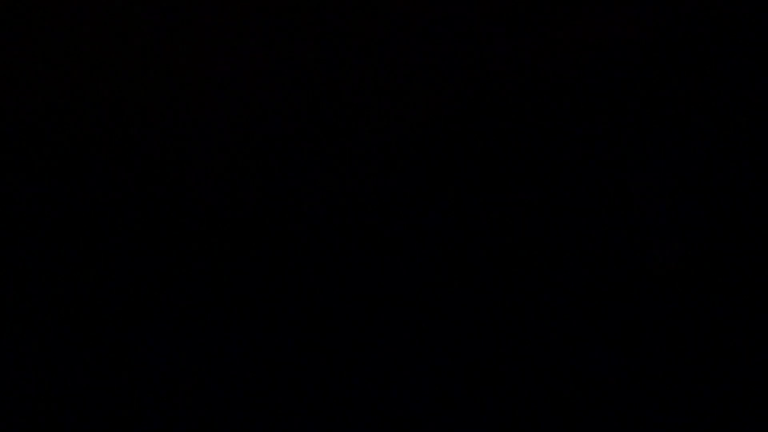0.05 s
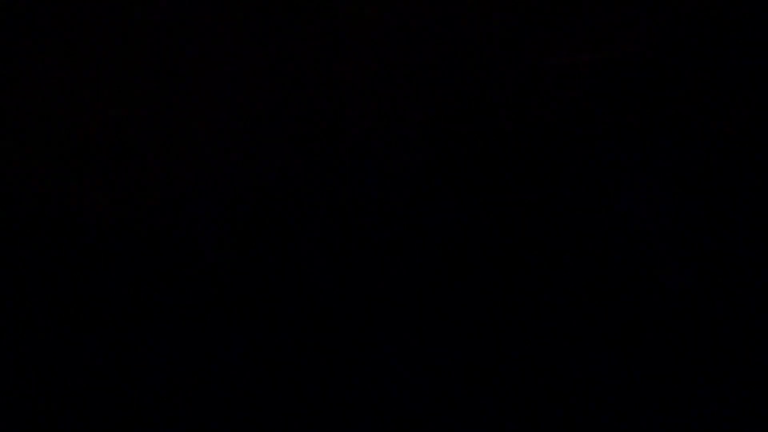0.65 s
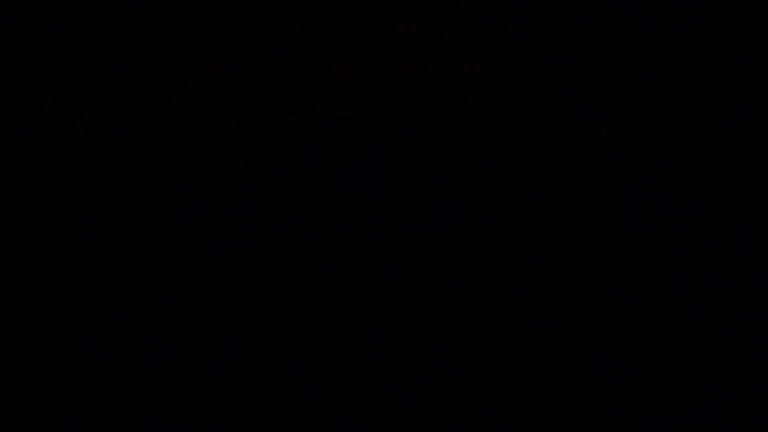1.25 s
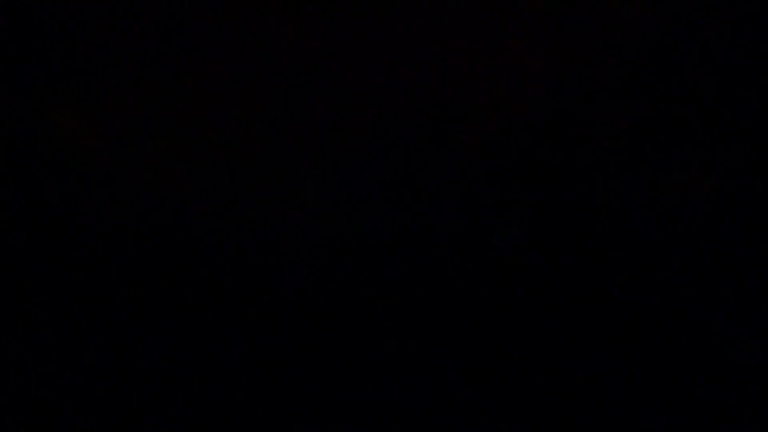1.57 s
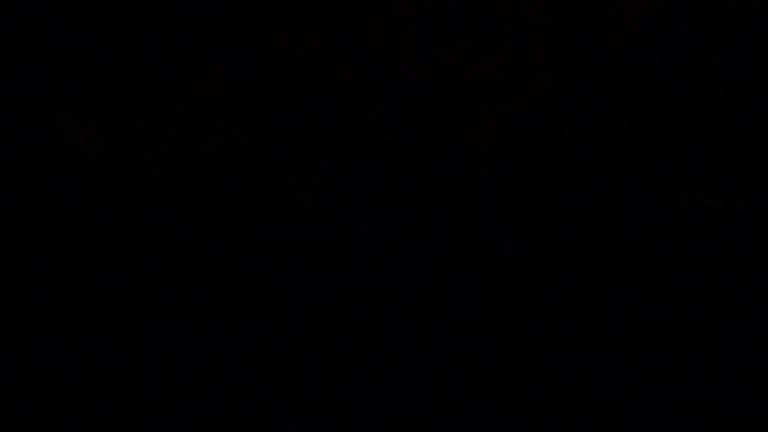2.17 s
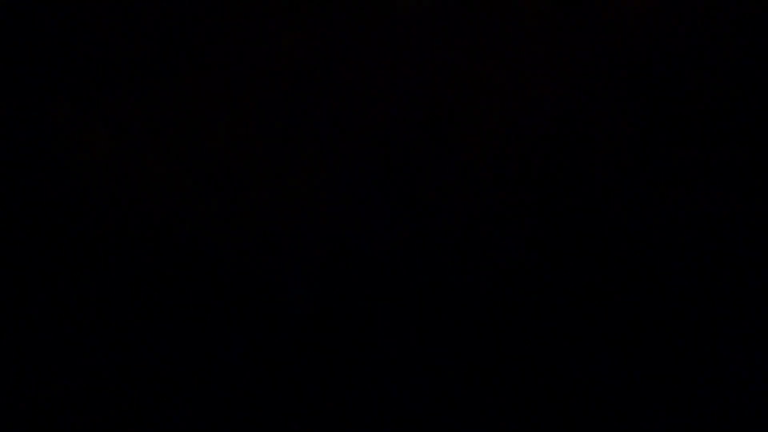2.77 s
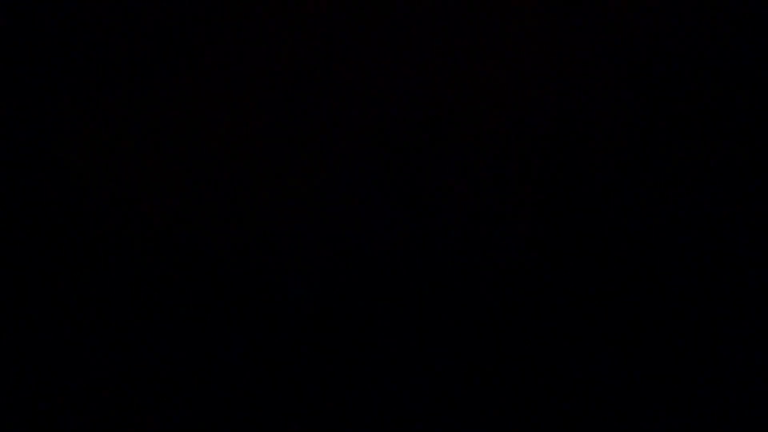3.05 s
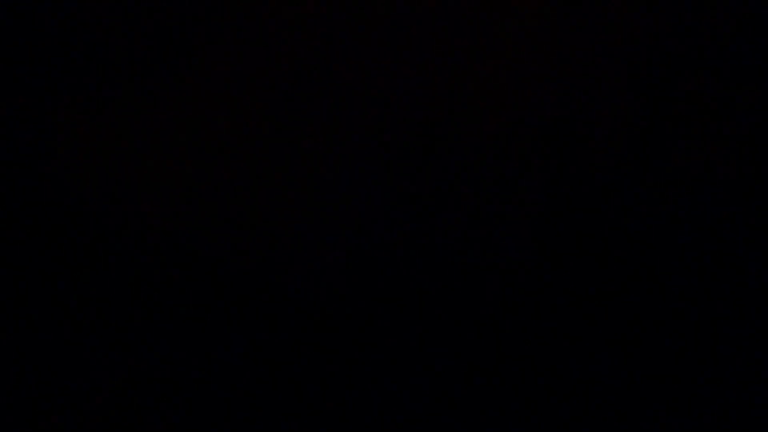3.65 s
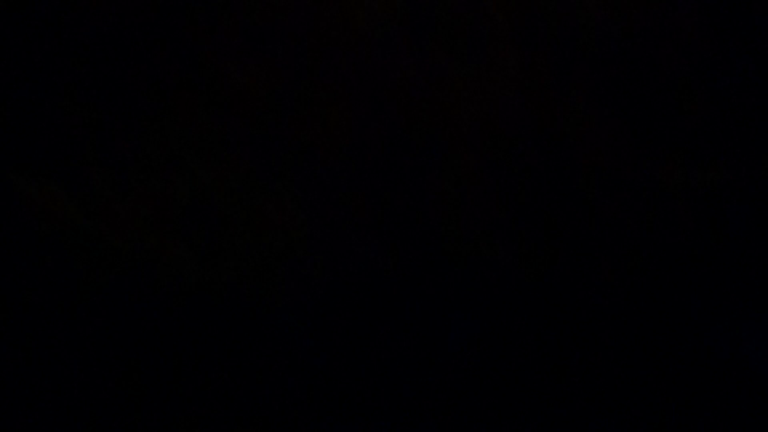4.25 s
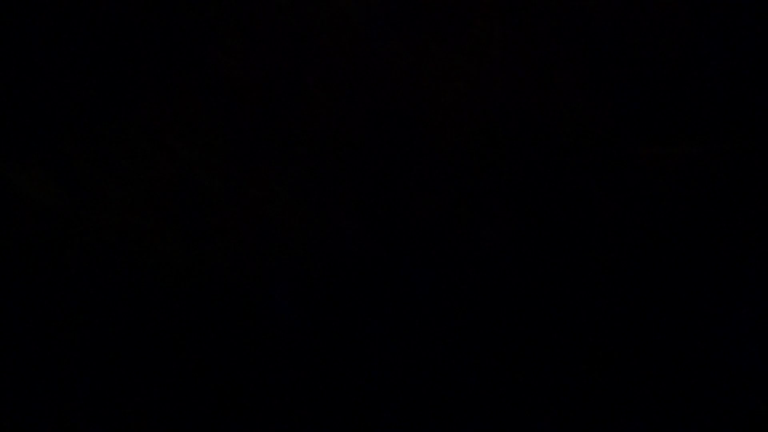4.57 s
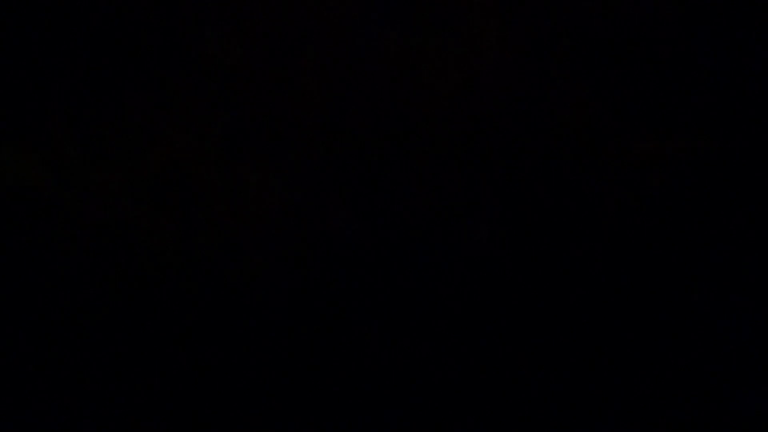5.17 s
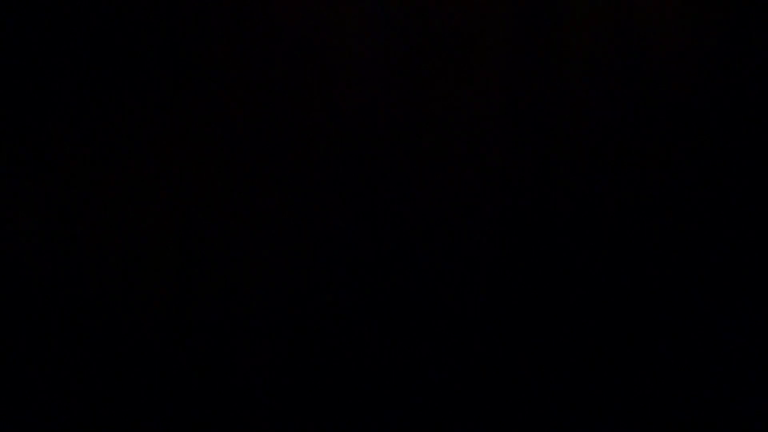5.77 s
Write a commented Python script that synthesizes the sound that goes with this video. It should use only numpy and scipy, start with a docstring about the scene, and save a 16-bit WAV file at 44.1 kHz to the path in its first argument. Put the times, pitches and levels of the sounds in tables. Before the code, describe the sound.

Fingers click and rub on a camera right by the microphone, against the soft hush and faint hiss of night woodland. A young owl gives two high, wheezy whistles that each turn into a rasping screech, with a short echo from the trees. A flurry of sharp handling clicks and dull bumps follows, then the owl begs once more and a few last clicks come as the echo fades.

```python
"""A quiet wood at night: a low hush and a faint hiss go on throughout, and from the start fingers
rub, click and bump on a camera's case close by. At about 1.4 s a young owl begs twice in a row:
each call is a thin, wheezy whistle that breaks into a harsh screech, and the trees throw it back.
The fingers are busiest between 2 and 3 s. At about 4.3 s the owl begs a third time,
and a few last clicks and a rub follow as its echo dies away."""
import sys
import numpy as np
from scipy import signal
from scipy.fft import rfft, irfft
from scipy.io import wavfile

SR = 44100
rng = np.random.default_rng(int(sys.argv[2]) if len(sys.argv) > 2 else 0)


def master(y):
    """Save y as 16-bit WAV."""
    cut = np.clip(np.atleast_2d(y).T, -1, 1)
    pcm = np.round(cut * 32767)  # scale
    wavfile.write(sys.argv[1], SR, pcm.astype(np.int16))


N = 255864

# How alike sounds on the case are left and right. Each row: frequency in Hz, likeness from 0 to 1.
CASE_LIKENESS = [(100, 0.82), (600, 0.65), (2200, 0.31), (6000, 0.5), (12000, 0.99)]


def gain_of(db):
    """Turns decibels into a number to multiply by."""
    return 10 ** (np.asarray(db) / 20)


def evened(x):
    """Scales a signal to an average strength (rms) of 1."""
    return x / np.sqrt(np.mean(x ** 2) + 1e-20)


def read(points, hz):
    """Looks up a table at any frequency, blending between rows on a log scale."""
    f, value = np.transpose(points)
    return np.interp(np.log(hz + 1), np.log(f + 1), value)


def add(mix, start, sound):
    """Mixes a sound in at a start time in seconds."""
    part = mix[..., max(round(start * SR), 0):][..., :sound.shape[-1]]
    part += sound[..., :part.shape[-1]]


def bins(size):
    """The frequencies in the spectrum of this many samples."""
    return np.fft.rfftfreq(size, 1 / SR)


def coloured(x, points):
    """Shapes a sound's tone with a table of frequencies in Hz and gains in dB."""
    return irfft(rfft(x) * gain_of(read(points, bins(x.shape[-1]))), x.shape[-1])


def muffled(x, hz, steepness):
    """Turns down everything above hz."""
    size = x.shape[-1]
    return irfft(rfft(x) / (1 + (bins(size) / hz) ** steepness), size)


def wobble(size, hz):
    """A random wiggle of strength 1, mostly slower than hz."""
    return evened(muffled(rng.standard_normal(size), hz, 4))


def noise_pair(size, likeness):
    """White noise for left and right, as alike as the table says."""
    left, other = rfft(rng.standard_normal((2, size)))
    same = np.clip(read(likeness, bins(size)), -1, 1)
    return irfft(np.array([left, same * left + np.sqrt(1 - same ** 2) * other]), size)


def hush(waver_db=1.41):
    """Low, far-off air that drifts in loudness, with a thin steady hiss on top."""
    # The tone of the night air. Each row: frequency in Hz, gain in dB.
    air_colour = [(25, -24), (50, -1), (92, -5), (122, -3.5), (190, -11), (460, -12.5), (650, -10),
                  (1200, -12), (3000, -27), (15000, -40), (16000, -47)]
    # How alike it is left and right. Each row: frequency in Hz, likeness from 0 to 1.
    air_likeness = [(60, 1.0), (240, 0.97), (950, 0.73), (3770, 0.38), (15000, 1)]
    # Its slow drift. Each row: time in seconds, level in dB.
    drift = [(0, -49), (2.5, -47.5), (3.7, -50.5), (5.8, -50)]
    level_db = np.interp(np.arange(N) / SR, *np.transpose(drift))
    noise = evened(coloured(noise_pair(N, air_likeness), air_colour))
    air = muffled(noise, 5000, 2)
    hiss = noise - air
    return air * gain_of(level_db + waver_db * wobble(N, 6)) + hiss * gain_of(level_db.mean())


def rub(length, level_db, slope_db, grain_db=3, catch_db=1.5):
    """Skin catches and slips on the case, making a grainy, uneven hiss."""
    # The tone of sliding skin. Each row: frequency in Hz, gain in dB.
    skin_colour = [(200, -33), (900, 5.5), (2100, 10.5), (4400, 1.5), (6000, -5), (9000, -5), (11500, -14),
                   (15000, -29)]
    size = 2 * round(length * SR / 2)
    slips = noise_pair(size, CASE_LIKENESS)
    slips *= gain_of(grain_db * wobble(size, 1400) + catch_db * wobble(size, 75))
    colour_db = read(skin_colour, bins(size)) + slope_db * np.log2(bins(size) + 1)
    sound = irfft(rfft(slips) * gain_of(colour_db))
    return gain_of(level_db) * evened(sound) * signal.windows.tukey(size, 0.27)


def bump(level_db, hz, ring_s):
    """A push on the case makes a low note that quickly dies."""
    t = np.arange(SR // 4) / SR
    return -gain_of(level_db - 60 * t / ring_s) * np.sin(2 * np.pi * hz * t)


def click(level_db, low_db, edge_db, spot_hz, spot_db=8, spot_width=0.093, snap=3.7, pan_db=-0.1):
    """A snap and a brief rattle ring through the case."""
    # The tone of the case. Each row: frequency in Hz, gain in dB.
    case_colour = [(100, -12.5), (450, -8), (680, 0.5), (1100, 1), (2000, 2.5), (3500, -1.5), (5000, -5),
                   (9000, -8.5), (11500, -20), (15500, -27)]
    size = 4096
    t, hz = np.arange(size) / SR, bins(size)
    rattle_s = 0.031 * 2 ** (low_db / 17.5)  # a heavier blow, with more bass, rattles longer
    dying = gain_of(-60 * t / rattle_s) + gain_of(-27 - 60 * t / 0.12)  # rattle plus a faint ring
    blow = noise_pair(size, CASE_LIKENESS) * dying
    blow *= 1 - np.exp(-t / 0.0004)  # the rattle builds over a few contacts
    blow[:, 0] += snap
    colour_db = read(case_colour, hz) + spot_db / (1 + ((hz / spot_hz - 1) / spot_width) ** 2)
    colour_db += read([(1000, low_db + 5.5), (1600, 0), (3600, 0), (8000, edge_db + 2.5)], hz)
    log_gain = np.log(gain_of(np.r_[colour_db, colour_db[-2:0:-1]]))
    ringing = np.exp(np.conj(signal.hilbert(log_gain)))[:len(hz)]  # rings only after the blow
    spectrum = rfft(blow) * ringing
    middle = irfft(spectrum.mean(0) * ((hz > 1400) & (hz < 4500)))
    strength = np.sqrt(np.sum(middle ** 2) / (SR * 0.01))  # as if packed into 10 ms
    return irfft(spectrum) * gain_of(level_db + np.array([[pan_db], [-pan_db]])) / strength


def fingers():
    """A hand clicks, bumps and slides on the case."""
    # Sharp clicks. Each row: start in seconds, level of the middle frequencies in dB, bass in dB,
    # treble in dB, ringing pitch of the struck spot in Hz.
    clicks = [ (0.2688, -48, -3, -19, 1530), (0.497, -29.5, -18, -6.5, 1370),
              (0.4987, -25.5, -14.5, -21, 2080), (0.5976, -41, -5, -16, 2880),
              (0.6261, -35.5, -3, -17, 1980), (1.0701, -44.5, -0.5, 0.5, 1750),
              (1.2426, -28, -16, -10.5, 4500), (1.2872, -44.5, -6, -21, 2100),
              (1.39, -43.5, -3.5, -5, 1320), (1.4428, -41, 0, 2, 1480), (2.1197, -35, -1, -10, 650),
              (2.463, -40, -14, -4.5, 1280), (2.5482, -32, -10.5, -6, 3100), (2.6808, -33, -5, -12, 870),
              (2.691, -34, -1.5, -8, 1840), (2.72, -39, -1, -17, 1790), (2.7239, -26.5, -3, 5.5, 4100),
              (2.727, -26, -5, -24, 1770), (2.773, -31.5, -5.5, -1.5, 3200), (3.013, -41, -10, -12.5, 1390),
              (3.0877, -40, -1.5, -5.5, 1480), (4.0863, -52.5, -20, 7, 1280), (4.319, -52.5, -7, 11, 3500),
              (4.3356, -38.5, -7, -15, 1720), (4.4442, -37.5, -8, -13, 1820),
              (4.4903, -44.5, -3.5, -12, 1340), (4.9326, -35.5, -11, -7.5, 1730),
              (5.1783, -44, -29, -5, 2800), (5.2085, -46, 2, -23, 660)]
    # Dull bumps. Each row: start in seconds, level in dB, pitch in Hz, seconds to fade by 60 dB.
    bumps = [(1.088, -37.5, 129, 0.046), (1.904, -34, 140.6, 0.035), (2.122, -20.5, 230, 0.013),
             (2.155, -30, 147.5, 0.084), (2.724, -25.5, 355, 0.021), (2.726, -23, 658, 0.028)]
    # Finger slides. Each row: start and end in seconds, level in dB, added brightness in dB per octave.
    rubs = [(0, 0.112, -57, 6), (0.971, 1.079, -54.5, 4), (1.124, 1.163, -55, 4.5),
            (1.248, 1.332, -52.5, 4.5), (2.319, 2.548, -43.5, 1), (3.051, 3.103, -46.5, 2.5),
            (4.002, 4.078, -52.5, 2.5), (5.2, 5.254, -47.5, 3)]
    mix = np.zeros((2, N))
    for start, *row in clicks:
        add(mix, start, click(*row))
    for start, *row in bumps:
        add(mix, start, bump(*row))
    for start, end, *row in rubs:
        add(mix, start, rub(end - start, *row))
    return mix


def wood_echo(call, build_s=0.0013, echo_db=-1):
    """Trunks and leaves scatter the call; the highest sounds die first."""
    # How long the wood rings. Each row: frequency in Hz, seconds to fade by 60 dB.
    ring_times = [(1800, 1.5), (3500, 0.95), (7000, 0.75), (14000, 0.58)]
    # The echo's tone. Each row: frequency in Hz, gain in dB.
    echo_colour = [(1800, -8.5), (2600, -4), (3500, 0.5), (5300, 0.5), (7000, 1.5), (9000, -3), (14000, -8)]
    # How alike it is left and right. Each row: frequency in Hz, likeness from 0 to 1.
    echo_likeness = [(2500, 0.63), (7000, 0.82), (12000, 1)]
    hz, t, bands = signal.stft(noise_pair(SR, echo_likeness), SR, nperseg=256)
    dying = gain_of(-60 * t / read(ring_times, hz)[:, None])
    tail = signal.istft(bands * dying, SR, nperseg=256)[1]
    tail = coloured(tail / np.linalg.norm(tail[0]), echo_colour)
    tail *= 1 - np.exp(-(np.arange(tail.shape[1]) / SR / build_s) ** 2)
    return gain_of(echo_db) * signal.fftconvolve(call[None], tail, axes=1)[:, :N]


def whistle_shape(length, scoop_s, hold_s, loudest_s, top_hz, sag_hz, bend_hz, held_db, loudest_db):
    """A whistle's pitch and level: it scoops up, holds, sags as it swells, then bends and fades."""
    t = np.arange(0, length, 1 / SR)
    after_hold = np.maximum(t - hold_s, 0)
    scoop = 1 - 0.36 * np.exp(-t / scoop_s)
    sag = 1 - np.exp(-after_hold / 0.029)
    bend = (after_hold / (length - hold_s)) ** 2.3
    level_db = np.interp(t, [hold_s, loudest_s, length], [held_db, loudest_db, loudest_db - 13])
    return top_hz * scoop - sag_hz * sag + bend_hz * bend, level_db


def whistle(hz, level_db, flutter_hz=280, flutter=0.32, shimmer_db=2, wheeze=0.72, air_db=-12):
    """A high tone, chopped by a fluttering membrane and frayed by swirling, rushing air."""
    # The tone of the air around the whistle. Each row: frequency in Hz, gain in dB.
    air_colour = [(2000, -18), (4200, -4), (5500, -6), (7000, 0), (9000, -11), (12000, -28)]
    size = len(hz)
    membrane = np.sin(2 * np.pi * np.cumsum(flutter_hz * (1 + 0.212 * wobble(size, 80))) / SR)
    cycles = np.cumsum(hz * (1 + .014 * wobble(size, 400) + .01 * membrane)) / SR
    fray = wheeze * (wobble(size, 600) + 1j * wobble(size, 600))  # shakes strength and timing
    tone = ((1 + fray) * np.exp(2j * np.pi * cycles)).real
    tone *= 1 + 2 * gain_of(-27) * np.cos(np.pi * cycles)  # strong and weak cycles take turns
    tone *= (1 + flutter * membrane) * gain_of(shimmer_db * wobble(size, 110))
    air = evened(coloured(rng.standard_normal(size), air_colour))
    return (evened(tone) + gain_of(air_db) * air) * gain_of(level_db) * signal.windows.tukey(size, .03)


def screech_shape(length, note_hz, crack_hz, loudest_db, swell_db, final_rough, open_db):
    """A screech climbs to its note as it swells and clears, cracks for an instant, and ends loud."""
    climb_hz_per_s, crack_s, shut_db = 3200, .011, -10
    t = np.arange(0, length, 1 / SR)
    on_note, crack_at, loudest = length * np.array([.6, .8, .91])
    crack = np.exp(-((t - crack_at) / crack_s) ** 2)
    hz = note_hz - climb_hz_per_s * np.maximum(on_note - t, 0) + crack_hz * crack
    level_db = loudest_db - swell_db * np.interp(t, [0, loudest], [1, 0]) ** 0.97
    level_db -= np.interp(t, [loudest, length], [0, 2.5])
    extra_rough = np.interp(t, [0, on_note, loudest], [1, 0.28, 0]) + 0.37 * crack
    rough = np.clip(final_rough + (1 - final_rough) * extra_rough, 0, 1)
    beak_db = open_db + shut_db * np.interp(t, [0, on_note, crack_at, length], [1, 0, 0, 1])
    return hz, level_db, rough, beak_db


def screech(hz, level_db, rough, beak_db, fray=0.96, fray_hz=450, shimmer_db=2, rasp_db=3):
    """An unsteady stack of overtones; roughness frays each one, then drowns them in rasping air."""
    # How the throat shapes the overtones. Each row: frequency in Hz, gain in dB.
    throat = [(1800, -0.5), (3500, -0.5), (5300, -5), (7000, -4.5), (8900, -4), (10400, -9), (12300, -26),
              (14000, -38)]
    # The tone of air rasping through the throat. Each row: frequency in Hz, gain in dB.
    breath = [(600, -22), (1400, -23), (2600, -12.5), (3500, 4.5), (4600, -5.5), (7000, 3.5), (9300, 1),
              (11500, -19), (15000, -42)]
    size = len(hz)
    cycles = np.cumsum(hz * (1 + (.008 + .025 * rough ** 2) * wobble(size, 300))) / SR
    stack = np.zeros(size)
    for k in range(1, 8):
        # each overtone swells and fades on its own, the high ones most
        swing = 1 + fray * rough * np.sqrt(k) / 2 * (wobble(size, fray_hz) + 1j * wobble(size, fray_hz))
        overtone = evened(abs(swing)) * np.cos(2 * np.pi * k * cycles + np.angle(swing))
        stack += gain_of(read(throat, k * hz)) * overtone
    air = coloured(rng.standard_normal(size), breath) * gain_of(rasp_db * wobble(size, 380))
    voice = np.sqrt(1 - rough ** 2) * evened(stack) + rough * evened(air)
    voice += (gain_of(beak_db) - 1) * muffled(voice, 3300, 8)  # a closing beak holds back low overtones
    voice *= gain_of(shimmer_db * wobble(size, 95))
    return voice * gain_of(level_db) * signal.windows.tukey(size, .03)


def owl(direct_db=-1, pan_db=0.66):
    """The owl whistles and screeches, heard both directly and back from the trees."""
    # High whistles. Each row: start, length, scoop time, end of the hold and loudest moment in seconds
    # (the last two counted from the start); top pitch, sag and final bend in Hz; held and loudest
    # level in dB, before the trip through the wood.
    whistles = [ (1.37, .285, .022, .134, 0.28, 6990, 1526, 1344, -45.5, -37),
                (1.77, .19, .005, 0.083, 0.15, 7600, 856, -400, -45, -40),
                (4.259, .155, 0.015, .082, .106, 7430, 1210, -450, -45, -35.5)]
    # Lower, harsh screeches. Each row: start and length in seconds, note and jump at the crack in Hz,
    # loudest level (before beak and wood) and swell up to it in dB, final roughness from 0 to 1,
    # the open beak's gain on low overtones in dB.
    screeches = [ (1.364, 0.04, 1560, 1, -57, 4, .2, 13.5), (1.503, .168, 1853, -150, -52.5, 2, 0.88, 16),
                 (1.772, 0.059, 1960, 3, -50.5, 4, .05, -25), (1.848, .2, 1730, 229.5, -31, 19, 0.29, 0.5),
                 (4.253, .018, 1587, -4, -46, 3, 0.2, 3.5),
                 (4.336, .168, 1758, 100.5, -29.5, 21.5, 0.04, -1)]
    voice = np.zeros(N)
    for start, *row in whistles:
        add(voice, start, whistle(*whistle_shape(*row)))
    for start, *row in screeches:
        add(voice, start, screech(*screech_shape(*row)))
    return voice * gain_of(direct_db + np.array([[pan_db], [-pan_db]])) + wood_echo(voice)


def scene():
    """The owl, the hand and the night air together."""
    return owl() + fingers() + hush()


def record(dry, top_hz=16100):
    """Cuts away the very highest treble."""
    low_pass = signal.firwin(511, top_hz, window=("kaiser", 9), fs=SR)
    return signal.oaconvolve(dry, low_pass[None], "same")


dry = scene()
out = record(dry)
master(out)
```